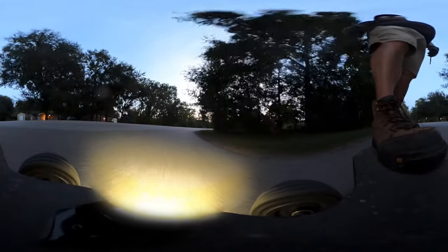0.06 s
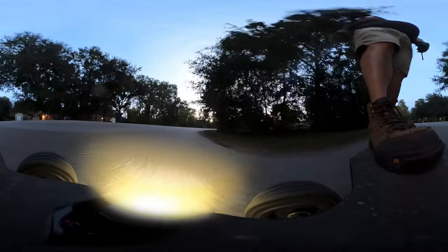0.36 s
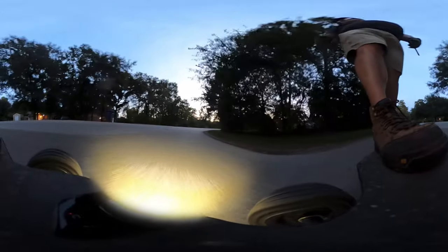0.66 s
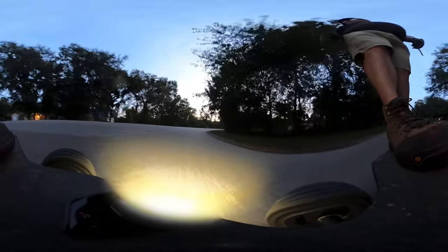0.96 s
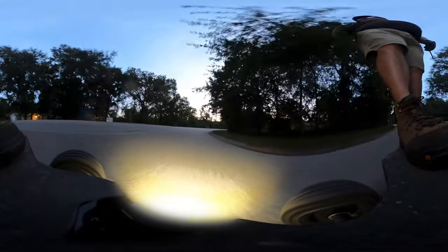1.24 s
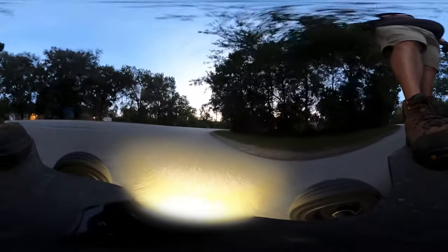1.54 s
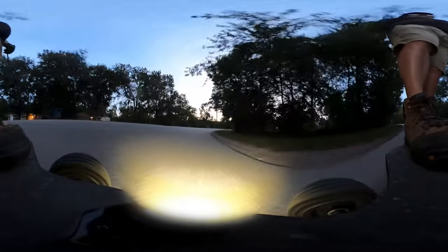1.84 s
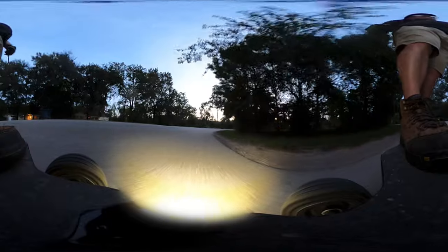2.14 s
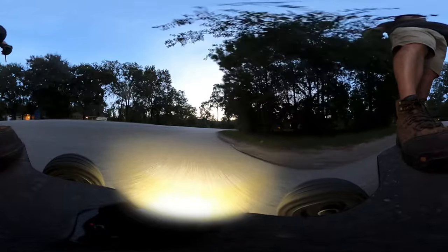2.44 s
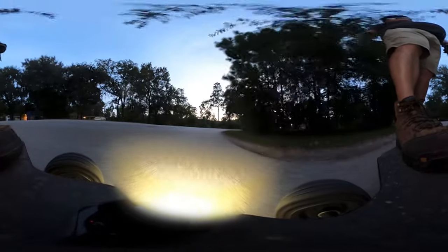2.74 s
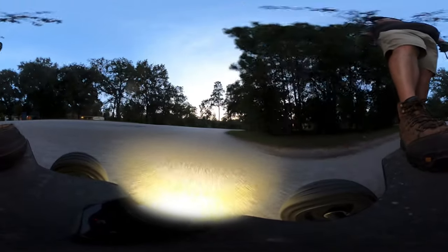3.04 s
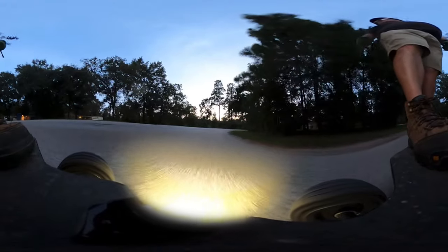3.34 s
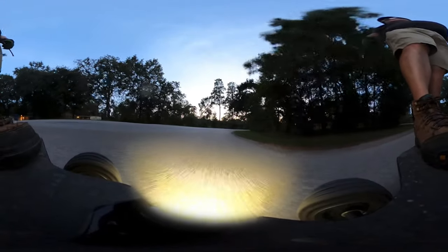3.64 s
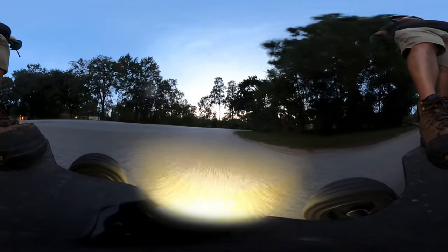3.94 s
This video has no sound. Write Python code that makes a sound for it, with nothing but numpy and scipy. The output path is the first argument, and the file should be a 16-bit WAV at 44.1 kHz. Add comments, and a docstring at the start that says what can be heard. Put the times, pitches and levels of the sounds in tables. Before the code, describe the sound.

An electric skateboard rolls over asphalt with a low rumble and steady belt whine.

```python
"""A belt-driven electric skateboard carves along an asphalt road, the microphone riding on its deck.
Close up, two toothed belts whine at slightly different speeds through the ringing motor mounts, and
one chatters in the tightest bend. Road texture and the tread of the air tyres drum the deck. Air
hisses, sand sprays, grit ticks, stones knock and snap; later come a rough patch and a brief low boom.
A limiter holds the rumble down."""
import sys
import numpy as np
from scipy import signal
from scipy.fft import rfft, irfft
from scipy.io import wavfile
from scipy.ndimage import uniform_filter1d, minimum_filter1d

SR = 44100
rng = np.random.default_rng(int(sys.argv[2]) if len(sys.argv) > 2 else 0)


def put_to_file(sound):
    """Save the sound as 16-bit audio at rate SR, in the file named by the first command-line argument."""
    columns = np.atleast_2d(sound).T  # one column per channel
    safe = np.clip(columns, -1, 1)
    whole_steps = np.round(safe * 32767)
    wavfile.write(sys.argv[1], SR, whole_steps.astype(np.int16))


N = 176400
TIME, FREQS = np.arange(N) / SR, np.arange(N // 2 + 1) * SR / N
WHEEL_TEETH, MOTOR_TEETH, POLE_PAIRS = 66, 15, 7
ROAD_GRAINS_PER_S, ROAD_SPREAD_DB = 2500, 3

# swell of the deck's drumming: t/s, level/dB
DRUM_SWELL = [(0, -7.5), (.35, 0.5), (.75, -6.5), (1.1, -2.5), (1.55, 4), (2.0, -0.5), (2.3, 0.5),
              (2.55, -1.5), (3.0, -1), (3.3, -2.5), (3.55, 1), (4, -3.5)]
# colour of sand striking the board: f/Hz, level/dB
SAND_COLOUR = [(1500, -11), (3400, 6), (4400, -2.5), (6700, 1), (8500, -9), (9400, -15.5), (12000, -33),
               (16000, -47)]


def undb(db):
    """Decibels to gain."""
    return 10 ** (np.asarray(db) / 20)


def unit(x):
    """Scale to an rms of one."""
    return x / np.sqrt(np.mean(x ** 2))


def curve(rows, column=1):
    """One column of a timed table, joined by straight lines."""
    rows = np.array(rows)
    return np.interp(TIME, rows[:, 0], rows[:, column])


def bell(at_s, width_s):
    """A smooth rise and fall, down to 1/e at width_s either side of its peak."""
    return np.exp(-((TIME - at_s) / width_s) ** 2)


def colour(x, points):
    """Causal filter with a spectrum of f/Hz, level/dB points; white noise keeps its power."""
    hz, db = np.array(points).T
    gain = unit(undb(np.interp(np.log(np.maximum(FREQS, 1)), np.log(hz), db)))
    cepstrum = irfft(np.log(gain), N)
    fold = 1 + np.sign(np.arange(N)) * np.sign(N / 2 - np.arange(N))  # minimum phase
    return irfft(rfft(x) * np.exp(rfft(cepstrum * fold)), N)


def resonate(x, hz, width_hz):
    """Pass a sound through one resonance, with a gain of one at its centre."""
    damping = 1j * FREQS * width_hz
    return irfft(rfft(x) * damping / (hz ** 2 - FREQS ** 2 + damping), N)


def ringing(hz, width_hz):
    """A resonance of steady or moving pitch, kept ringing by random shocks."""
    offset_hz = ((np.arange(N) + N // 2) % N - N // 2) * SR / N
    shocks = rng.standard_normal(N) + 1j * rng.standard_normal(N)
    swing = np.fft.ifft(shocks / (1 + 2j * offset_hz / width_hz) ** 2)
    phase = 2 * np.pi * np.cumsum(hz * np.ones(N)) / SR
    return unit(np.real(swing * np.exp(1j * phase)))


def walk(rate_hz):
    """Smooth random motion of unit spread, up to about rate_hz."""
    lowpass = np.exp(-.5 * (FREQS / rate_hz) ** 2) * (FREQS > 0)
    return unit(irfft(rfft(rng.standard_normal(N)) * lowpass, N))


def grains(per_s, spread_db):
    """Random tiny impacts, a few much stronger than the rest."""
    hits = (rng.random(N) < per_s / SR) * rng.choice([-1, 1], N)
    return unit(hits * undb(spread_db * np.minimum(rng.exponential(size=N), 5)))


def impacts(rows, spectrum, decay_s, crunch, gain_db, column=1):
    """Each hit is one sharp blow and a short crunch after it."""
    force = np.zeros(N)
    fade = np.exp(-TIME[:SR // 10] / decay_s)
    for row in rows:
        start = int(row[0] * SR)
        hit = crunch * rng.standard_normal(len(fade)) * fade
        hit[0] = 2  # the blow
        force[start:start + len(hit)] += undb(row[column] + gain_db) * hit[:N - start]
    return colour(force, spectrum)


def belt(teeth, side):
    """Teeth mesh with a flutter from the motor pulley and a wobble from the wheel."""
    # belt partials: multiple of the tooth rate, first belt level/dB, second belt level/dB
    partials = [(1, -44.5, -49.5), (2, -60, -59.5), (3, -54.5, -60.5), (4, -69, -64), (5, -75.5, -67.5)]
    wobble_rad, flutter, roughness = .7, .14, .22
    phase = 2 * np.pi * teeth
    out = 0
    for multiple, *levels_db in partials:
        start = rng.uniform(0, 2 * np.pi, 3)
        wobble = wobble_rad * np.sin(phase / WHEEL_TEETH + start[0])
        swell = 1 + flutter * np.sin(phase / MOTOR_TEETH + start[1]) + roughness * walk(28)
        tone = np.sqrt(2) * np.sin(multiple * phase + wobble + start[2])
        out += undb(levels_db[side]) * swell * tone
    return out


def mounts(whine):
    """Belt partials swell as they cross a resonance of the motor mounts; belt rasp keeps two ringing."""
    # the two main mount resonances: f/Hz, width/Hz, lift/dB, rasp/dB
    modes = [(1800, 80, 11, -51.5), (2486, 62, 11.5, -56)]
    # swell of those resonances: t/s, lower level/dB, upper level/dB
    mode_swell = [(0, 1, 7.5), (.25, 2.5, 6.5), (.4, 2, 0), (.55, 1.5, 1), (.7, 1.5, 4), (.85, -5, -1),
                  (1.15, 1, 1.5), (1.5, -2, -6), (1.75, -2, 0), (1.87, 3, -3), (2.0, -2, 5), (2.12, -2, 6),
                  (2.27, -2, -1), (2.6, -4.5, -7), (3.0, -4, -2), (3.4, 0, 0), (4, -3, 0)]
    out = whine + undb(11) * resonate(whine, hz=2891, width_hz=50)  # a third, higher resonance
    for column, (hz, width_hz, lift_db, rasp_db) in enumerate(modes, 1):
        lift = undb(lift_db) * resonate(whine, hz, width_hz)
        rasp = undb(rasp_db) * ringing(hz, width_hz)
        out += undb(curve(mode_swell, column)) * (lift + rasp)
    return out


def motor(teeth):
    """The magnets hum as they pass the coils."""
    # magnet hum: t/s, level/dB
    hum_level = [(0, -34.5), (.12, -22), (.3, -18), (.45, -25.5), (.75, -31), (1.0, -25.5), (1.5, -31.5),
                 (1.95, -24), (2.4, -27.5), (4, -36)]
    phase = 2 * np.pi * teeth * POLE_PAIRS / MOTOR_TEETH
    swell = undb(curve(hum_level)) * (1 + .3 * walk(6.7))
    return swell * np.sin(phase + rng.uniform(0, 2 * np.pi))


def tyre(turns):
    """The uneven tread thrums at multiples of the wheel turn, shaken by the road."""
    # tread partials: multiple of the wheel turn, level/dB
    partials = [(4, -29.5), (6, -24.5), (10, -32.5), (16, -31), (19, -25.5), (20, -27.5), (21, -27),
                (22, -27), (24, -30.5)]
    shake = .85
    drumming = undb(curve(DRUM_SWELL))
    out = 0
    for multiple, db in partials:
        waver = (1 + shake * (walk(7) + 1j * walk(3.6))) / np.sqrt(.5 + shake ** 2)
        thrum = undb(db) * np.real(waver * np.exp(2j * np.pi * (multiple * turns + rng.random())))
        out += thrum * (drumming if multiple >= 16 else 1)  # upper partials swell with the deck
    return out


def road():
    """Asphalt grains roar through the tyres."""
    # colour of the road roar: f/Hz, level/dB
    roar_colour = [(18, -22), (33, -9), (70, -3.5), (130, -2), (230, 2), (300, -6.5), (370, -9), (480, -20),
                   (620, -22), (800, -28.5), (1050, -32.5), (1200, -31), (1500, -37), (1800, -32.5),
                   (2050, -46), (2400, -52.5), (4000, -78), (16000, -125)]
    # coarseness of the asphalt: t/s, level/dB
    coarseness = [(0, -20.5), (.38, -20.5), (.7, -23.5), (1.0, -20), (1.3, -21), (1.6, -21.5),
                  (1.95, -20.5), (2.25, -20.5), (2.6, -21.5), (2.9, -22.5), (3.15, -23.5), (3.35, -23),
                  (4, -21.5)]
    roar = unit(colour(grains(ROAD_GRAINS_PER_S, ROAD_SPREAD_DB), roar_colour))
    return undb(curve(coarseness) + 6) * roar


def deck():
    """The road flexes the deck and makes it drum, right under the microphone."""
    # swell of the deck's slow flexing: t/s, level/dB
    flex_swell = [(0, 1), (.55, 1), (1.15, 3.5), (1.7, -1.5), (2.3, 2), (2.8, -4), (3.2, -3.5), (3.55, -5),
                  (4, -1.5)]
    # pitch of the drumming, following the rider's weight through the bends: t/s, f/Hz
    drum_pitch = [(0, 200), (.35, 199), (.65, 188), (.95, 175), (1.2, 177), (1.45, 186), (1.8, 182),
                  (2.1, 187), (2.5, 198), (2.85, 179), (3.25, 171), (3.5, 185), (3.9, 191), (4, 180)]
    flex = undb(curve(flex_swell) - 24.5) * ringing(hz=55, width_hz=24)
    drum = undb(curve(DRUM_SWELL) - 15) * ringing(curve(drum_pitch), width_hz=32.8)
    return flex + drum


def hiss(turns):
    """Air and tyres hiss with gusts of fine sand, flickering and pulsing faintly with the wheel."""
    # colour of the tyre and air hiss: f/Hz, level/dB
    air_colour = [(1000, -8), (2250, -5.5), (2650, 9.5), (3050, -3), (3500, 1.5), (4400, -7.5), (5100, -6),
                  (5800, -12), (6700, -10.5), (7600, -25.5), (8600, -25.5), (9300, -32.5), (12000, -48.5),
                  (16000, -69)]
    # swell of the hiss: t/s, level/dB
    hiss_swell = [(0, 5.5), (.25, 2.5), (.4, 0), (1.1, 1), (1.6, -0.5), (1.85, 0), (2.15, 1.5), (2.7, -1),
                  (3.3, 0), (4, 0)]
    swell_db = curve(hiss_swell) + 1.03 * walk(15) - .1 * np.sin(2 * np.pi * turns)
    sand = undb(-61.5 + 2.5 * walk(14)) * grains(per_s=2300, spread_db=4)
    air = undb(-50.5) * rng.standard_normal(N)
    return undb(swell_db) * (colour(air, air_colour) + colour(sand, SAND_COLOUR))


def sprays():
    """The tyres throw short showers of sand against the board."""
    # sand showers: t/s, length/s, level/dB
    showers = [(.107, 0.045, -58), (0.242, 0.028, -56), (0.435, 0.009, -58), (.83, .04, -61),
               (1.242, 0.036, -54), (1.367, 0.011, -51), (1.445, 0.054, -52.5), (1.454, .01, -52),
               (1.909, 0.037, -55.5), (2.207, 0.012, -51), (2.39, .022, -51), (2.428, 0.042, -50.5),
               (2.483, 0.017, -52.5), (2.552, 0.036, -54.5), (2.74, .011, -47), (2.92, 0.028, -54),
               (3.032, 0.018, -54), (3.205, .025, -54), (3.346, 0.015, -50), (3.47, .025, -56),
               (3.64, .01, -48.5), (3.9335, .01, -51.5)]
    swell = sum(undb(db) * bell(at_s, length_s / 2) for at_s, length_s, db in showers)
    return colour(swell * grains(per_s=8100, spread_db=2.5), SAND_COLOUR)


def chips():
    """Chips of grit tick as they are flicked against the board."""
    # chip strikes: t/s, level/dB
    strikes = [(.1895, -38), (.724, -48), (.8085, -44), (1.1044, -45.5), (1.1648, -45), (1.238, -44),
               (2.6948, -47), (3.014, -50), (3.3455, -50)]
    # colour of a chip's tick: f/Hz, level/dB
    tick_colour = [(1000, -27), (2800, -12), (3500, 6.5), (4800, 0.5), (5600, -9), (7000, -11.5),
                   (8700, -25.5), (11000, -34.5), (16000, -45)]
    return impacts(strikes, tick_colour, decay_s=.0042, crunch=.46, gain_db=6.5)


def stones():
    """A stone thumps and cracks under a tyre and snaps as it shoots out."""
    # stones run over: t/s, thump level/dB, crack level/dB, snap level/dB
    strikes = [(.3658, -22, -26, -42), (.3738, -13, -18, -38), (.4868, -16, -19, -35),
               (1.4817, -17, -17, -36), (1.5217, -20, -23, -40), (1.5558, -18, -25, -46),
               (1.8008, -9.5, -14, -25), (2.125, -23, -22, -31), (2.1553, -20, -19, -42),
               (2.1884, -12, -13, -32), (2.2625, -16, -14, -42), (2.2724, -22, -19, -29),
               (2.3654, -14, -11, -28), (2.4764, -16, -18, -41), (2.5243, -15, -18, -39),
               (2.5417, -18, -16, -31), (2.5781, -17, -14, -28), (2.684, -21, -23, -40),
               (2.7994, -23, -22, -42), (2.9934, -21, -27, -40), (3.349, -19, -23, -38),
               (3.3538, -16, -17, -32)]
    # colours of the low thump, the mid crack and the bright snap: f/Hz, level/dB
    thump_colour = [(150, -19), (380, -0.5), (520, 5.5), (750, -5), (1100, -10), (2200, -38.5),
                    (6000, -65.5), (16000, -94)]
    crack_colour = [(300, -5), (900, 3), (1400, 5), (1800, 4), (2200, -7), (2800, -10.5), (4800, -27),
                    (5800, -39.5), (16000, -76)]
    snap_colour = [(1500, -14), (2600, 0), (3700, -1), (4900, -2), (5700, -24), (9000, -45), (16000, -70)]
    decay_s, crunch = .004, .11
    thumps = impacts(strikes, thump_colour, decay_s, crunch, gain_db=8.5, column=1)
    cracks = impacts(strikes, crack_colour, decay_s, crunch, gain_db=1, column=2)
    snaps = impacts(strikes, snap_colour, decay_s, crunch, gain_db=0, column=3)
    return thumps + cracks + snaps


def chatter(teeth):
    """Side load in the tightest bend rubs a belt on its pulley flange once every motor turn."""
    # chatter partials: multiple of the motor turn, level/dB
    partials = [(28, -51), (29, -48), (31, -55.5), (36, -61), (37, -54.5), (39, -51), (40, -50)]
    phase = 2 * np.pi * teeth / MOTOR_TEETH
    rub = sum(undb(db) * np.sin(k * phase + rng.uniform(0, 2 * np.pi)) for k, db in partials)
    return np.sqrt(2) * bell(at_s=.94, width_s=.4) * rub


def rough_patch():
    """A stretch of coarser asphalt shudders the trucks."""
    # colour of the shudder: f/Hz, level/dB
    shudder_colour = [(60, -31), (200, -15.5), (260, 4.5), (400, 0), (480, -13.5), (1000, -36.5),
                      (4000, -70.5), (16000, -115)]
    shudder = colour(grains(ROAD_GRAINS_PER_S, ROAD_SPREAD_DB), shudder_colour)
    return undb(-22) * bell(at_s=2.32, width_s=.37) * shudder


def boom():
    """A low boom swells briefly under the roll."""
    return undb(-20.5) * bell(at_s=3.3, width_s=.13) * ringing(hz=97, width_hz=34)


def scene():
    """Two driven wheels, the road and what lies on it, heard in mono from the deck."""
    # tooth rates of the belts, which part in the bends: t/s, first f/Hz, second f/Hz
    tooth_rates = [(0, 624, 622), (.18, 617, 627), (.35, 607, 612), (.53, 596, 596), (.7, 618, 612),
                   (.95, 639, 613), (1.15, 628, 608), (1.45, 623, 605), (1.75, 615, 616), (2.05, 613, 621),
                   (2.3, 608, 615), (2.6, 603, 606), (3.0, 602, 596), (3.35, 606, 589), (3.7, 609, 598),
                   (4.0, 606, 594)]
    teeth = [np.cumsum(curve(tooth_rates, column)) / SR for column in (1, 2)]  # teeth meshed so far
    turns = [count / WHEEL_TEETH for count in teeth]
    whine = belt(teeth[0], side=0) + belt(teeth[1], side=1)
    drive = mounts(whine) + motor(teeth[0]) + motor(teeth[1]) + chatter(teeth[1])
    rolling = tyre(turns[0]) + tyre(turns[1]) + road() + deck() + rough_patch() + boom()
    return (drive + rolling + hiss(turns[0]) + stones() + chips() + sprays())[None]


def record(dry):
    """The recorder's look-ahead limiter eases the biggest swings; a steep low-pass cuts the top."""
    limit_db, hold_s, ahead_s, top_hz = -3.5, .01, .0022, 15700
    hold, ahead = int(hold_s * SR) + 1, int(ahead_s * SR) + 1
    allowed_gain = np.minimum(1, undb(limit_db) / (np.abs(dry) + 1e-9))
    held_gain = minimum_filter1d(allowed_gain, hold)
    smooth_gain = uniform_filter1d(uniform_filter1d(held_gain, hold), ahead)
    lowpass = signal.ellip(8, .2, 70, top_hz, fs=SR, output="sos")
    return signal.sosfilt(lowpass, dry * smooth_gain)


dry = scene()
out = record(dry)
put_to_file(out)
```